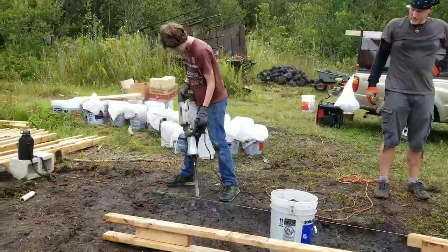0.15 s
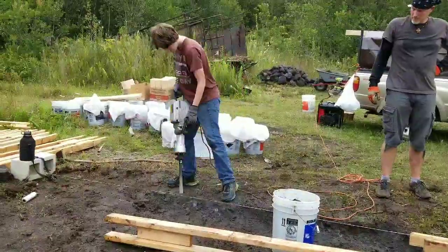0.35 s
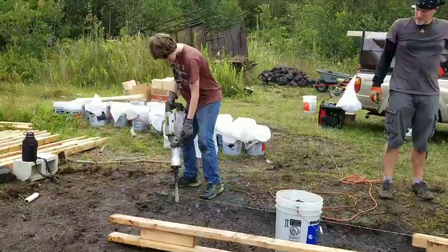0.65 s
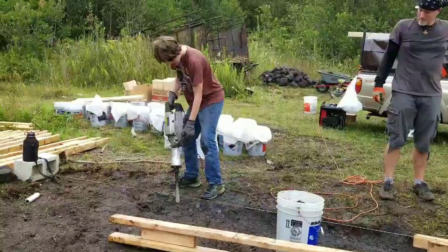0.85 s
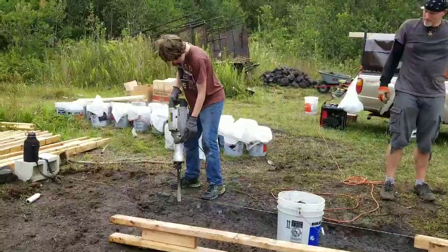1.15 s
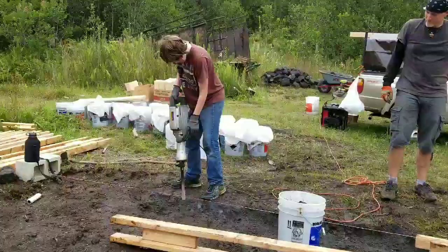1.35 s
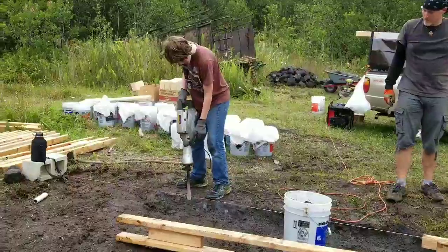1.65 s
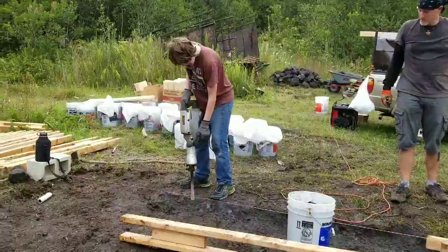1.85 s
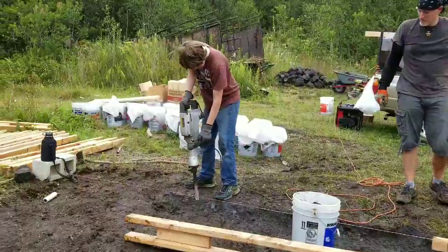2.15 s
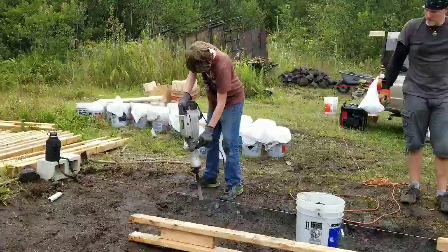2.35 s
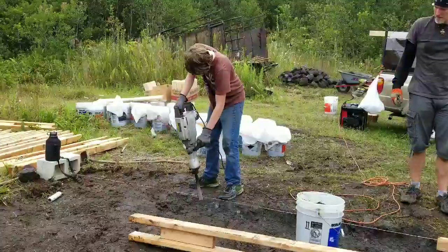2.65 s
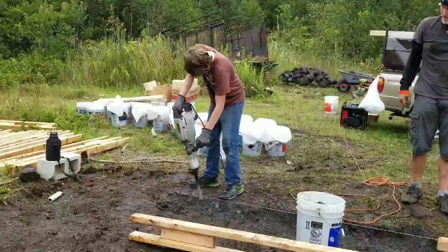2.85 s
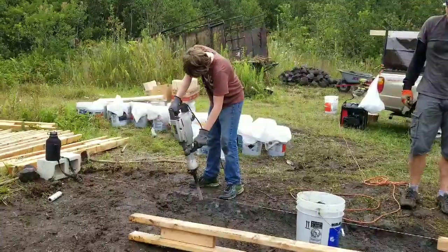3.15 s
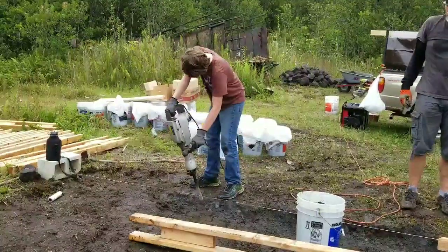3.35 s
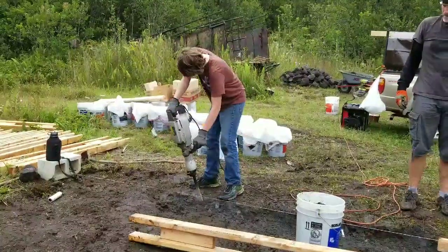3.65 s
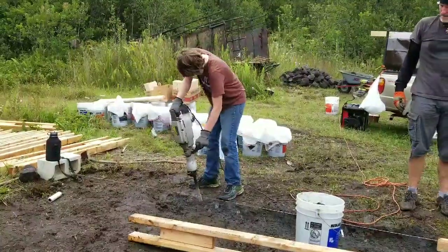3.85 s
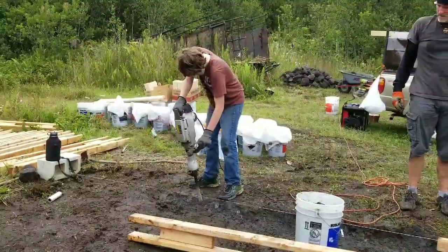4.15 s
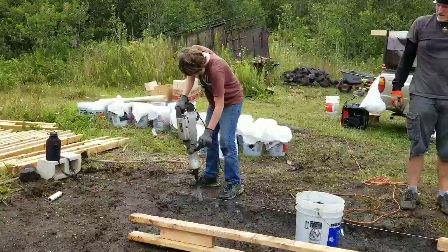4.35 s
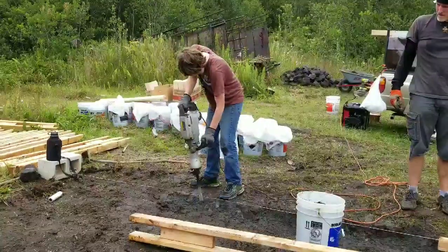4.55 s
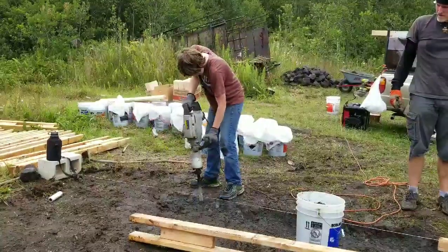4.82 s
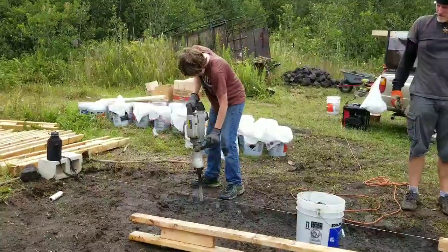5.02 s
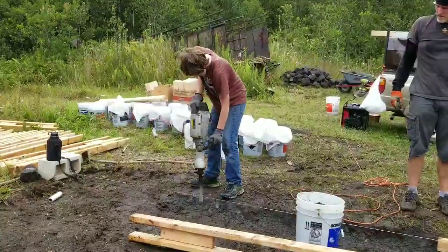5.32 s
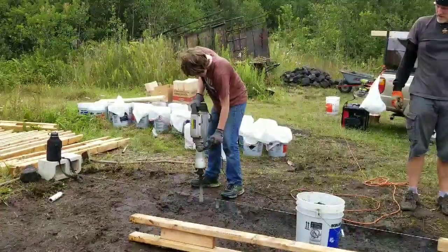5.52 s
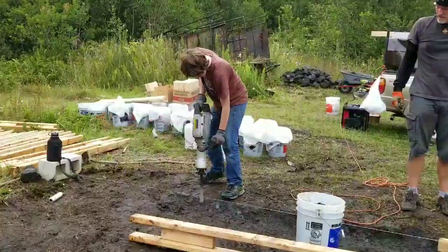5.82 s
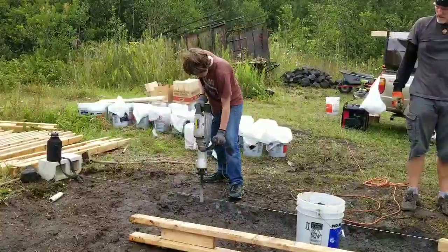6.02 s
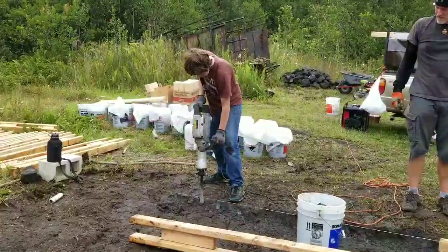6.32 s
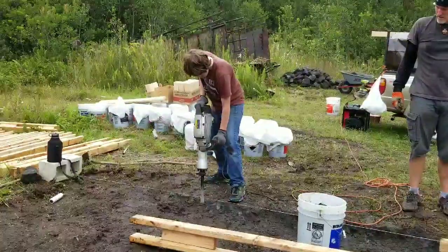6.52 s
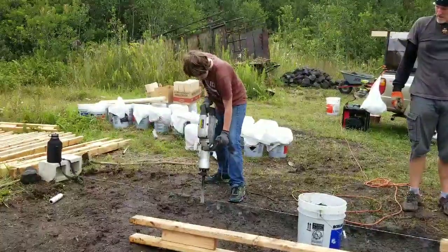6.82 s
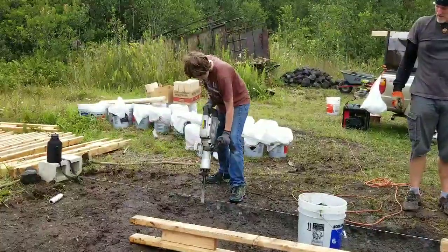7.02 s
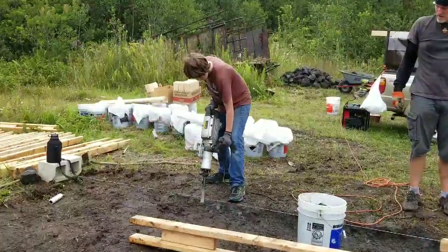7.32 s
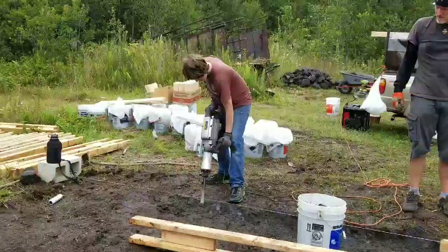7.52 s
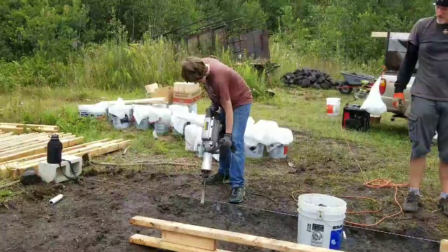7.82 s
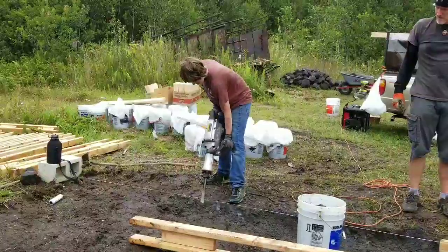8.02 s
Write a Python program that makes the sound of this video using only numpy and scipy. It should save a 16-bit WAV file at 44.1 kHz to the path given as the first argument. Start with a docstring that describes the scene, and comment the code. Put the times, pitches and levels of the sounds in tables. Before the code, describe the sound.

First only a small engine chugging low, slightly to the right, with a mechanical rattle. Two brief metallic clanks follow as a heavy breaker is set on rocky ground. Just before three seconds its motor whirs up, the engine briefly bogs, and hard hammering starts: bright, dry, rapid cracks with ringing steel over knocking soil, continuous and slightly uneven until the cut-off. Close, open yard, little reverberation.

```python
"""Electric jackhammer beside a generator

Outdoors, before a microphone with two ports, an electric jackhammer breaks rocky ground.
The tool is set down twice with a clank, then its motor runs up and the striker hits about 24 times a second.
Each blow is shaped noise for cracking stone and knocking ground, plus decaying modes for the ringing steel.
The chisel rings until it seats again. A generator off to the right thuds with filtered engine pulses.
"""
import sys
import numpy as np
from scipy import signal
from scipy.fft import rfft, irfft, next_fast_len
from scipy.io import wavfile

SR = 44100
rng = np.random.default_rng(int(sys.argv[2]) if len(sys.argv) > 2 else 0)


def put_to_file(sound):
    """Save the sound as 16-bit audio at rate SR, in the file named by the first command-line argument."""
    columns = np.atleast_2d(sound).T  # one column per channel
    safe = np.clip(columns, -1, 1)
    whole_steps = np.round(safe * 32767)
    wavfile.write(sys.argv[1], SR, whole_steps.astype(np.int16))


N = 360297
TIME = np.arange(N) / SR
AGE = np.arange(SR // 5) / SR  # time since a contact, s

# running speed of the striker, wavering with the load: time_s, blows_per_s
STRIKE_RATE = [(3.35, 24.05), (3.6, 23.64), (4.4, 23.55), (4.7, 23.87), (5.7, 23.72), (6.05, 24.02),
               (6.8, 23.5), (7.02, 24.47), (7.2, 23.63), (7.65, 23.61), (7.9, 24.04)]
FIRST_BLOW_S = 2.8245
# extra wait after the first blow while the motor gathers speed; share of it left at each next blow
RUN_UP_WAIT_S, RUN_UP_SHRINK = .0412, .5784


def blow_times(count=125):
    """The gaps between blows shrink as the motor runs up, then follow its speed."""
    times = [FIRST_BLOW_S]
    for k in range(count - 1):
        running_gap = 1 / curve(STRIKE_RATE, times[-1])[0]
        run_up_wait = RUN_UP_WAIT_S * RUN_UP_SHRINK ** k
        times.append(times[-1] + running_gap + run_up_wait)
    return np.array(times)


# how hard the bit bites, before scatter and mixing: time_s, stone_crack_db, ground_knock_db
BITE = [(2.82, -13, -34), (3, -16, -35), (3.15, -13.5, -28), (3.55, -18.5, -36), (3.9, -14.5, -32.5),
        (4.45, -18, -33.5), (4.9, -15, -34.5), (5.45, -16.5, -33.5), (6.42, -14, -27.5), (6.7, -16, -33),
        (7.3, -17, -31), (7.9, -15.5, -28.5), (8.02, -14, -36)]
# the bit's play, loose on rock and tight once buried, before scatter: time_s, ring_db, free_ring_s
PLAY = [(2.82, -17, 0.022), (2.98, -11, 0.02), (3.13, -13.5, 0.0091), (3.28, -12.5, 0.03),
        (3.6, -19.5, 0.028), (4.03, -17.5, 0.025), (4.14, -25, 0.021), (4.42, -15, 0.019),
        (4.95, -20, 0.018), (5.55, -18, 0.021), (5.98, -22, 0.019), (6.05, -43, .008), (6.65, -16.5, 0.02),
        (7, -23, 0.015), (7.4, -38, 0.0059), (7.92, -39, 0.0055), (7.97, -17.5, 0.022),
        (8.13, -11.5, 0.039)]
# chance from blow to blow: force, hardness of the ground, rebound (in ring level)
FORCE_SCATTER_DB, GROUND_SCATTER_DB, REBOUND_SCATTER_DB = 1, 1.45, 4.5
FREE_STRETCH_PER_DB = -0.03  # a livelier rebound is choked sooner


def strikes():
    """Time, crack, knock, ring and free ringing time of each blow: bite and play, varied by chance."""
    s = blow_times()
    crack_db, knock_db = curve(BITE, s)
    ring_db, free_s = curve(PLAY, s)
    force, ground, rebound = rng.standard_normal((len(s), 3)).T
    force_db = FORCE_SCATTER_DB * force
    ground_db = GROUND_SCATTER_DB * ground
    rebound_db = REBOUND_SCATTER_DB * np.minimum(rebound, 1)
    free_s = free_s * np.exp(FREE_STRETCH_PER_DB * rebound_db)
    return s, crack_db + force_db, knock_db + force_db + ground_db, ring_db + rebound_db, free_s


# steel cracking on stone, spectrum: freq_hz, relative_db_per_hz
CRACK_SPECTRUM = [(900, -40), (2000, -58), (2400, -1.5), (2750, -10), (3300, -8), (3600, -9), (4400, 3),
                  (6000, -1.5), (7100, 2.5), (8200, -18), (10000, -18), (12500, -7), (15000, -23),
                  (16500, -5)]
# the knock of the ground, spectrum: freq_hz, relative_db_per_hz
KNOCK_SPECTRUM = [(200, -26.5), (370, -32), (520, -12.5), (700, 2.5), (950, -6), (1350, -5.5), (1900, 4.5),
                  (2200, -10.5), (3500, -16)]
# the thud of packed soil, spectrum: freq_hz, relative_db_per_hz
SOIL_SPECTRUM = [(180, -25.5), (290, -9.5), (380, -3), (450, -8.5), (560, -32), (780, -8.5), (960, 0.5),
                 (1200, -20.5)]
# packed soil thuds more as the bit sinks in: time_s, thud_db (relative to the knock, before mixing)
DEPTH = [(2.8, -9.5), (5.3, -7), (6.1, -4.5), (7.1, 2.5), (7.9, 0), (8.05, -1.5)]
# modes of the tool holder ringing freely: freq_hz, level_db, t60_s
HOLDER_MODES = [(2314, -8.5, 0.048), (3904, -13.5, 0.08), (3988, -2.5, 0.069), (4610, -6, 0.045),
                (5470, -5, 0.042), (5880, -5, 0.09), (6060, -30, 0.61), (6970, -10, .09), (8300, -26, 0.15),
                (11300, -36, 0.052), (14150, -23, .12)]


def blows(s, crack_db, knock_db, ring_db, free_s):
    """Steel cracks on stone, the ground knocks and the holder rings; a soft treble noise burst follows."""
    soil_db = knock_db + curve(DEPTH, s)[0] - 2
    crack = contacts(s, crack_db - 1.12, CRACK_SPECTRUM, burst(t60=0.017, attack=0.000078), repeat=0.44)
    knock = contacts(s, knock_db - .5, KNOCK_SPECTRUM, burst(t60=0.035, attack=0.00044), repeat=0.33)
    thud = contacts(s, soil_db, SOIL_SPECTRUM, burst(t60=0.04, attack=0.00025), repeat=0.54)
    # a soft treble noise burst, starting 6 ms before the chisel's ring is choked
    soft_s = s + free_s - .006
    soft = contacts(soft_s, ring_db - 14, CRACK_SPECTRUM, burst(t60=0.023, attack=0.0034), repeat=.05)
    rings = np.zeros(N)
    pressed = amp(-60 * AGE / 0.15)  # the holder is damped while the tool is leant on
    for when, high_db, low_db in zip(s, crack_db, knock_db):
        add(rings, when, amp(high_db - 10.5) * stone(centre_hz=4776, width=0.204, t60=0.05))
        add(rings, when, amp(low_db - 6) * stone(centre_hz=1860, width=0.16, t60=0.02, count=3))
        holder = ring(HOLDER_MODES, 0, scatter_db=5.0, detune=0.0057, phase_scatter=3.43)
        add(rings, when, amp(high_db - 16.5) * holder * pressed)
    return rings + spread(crack + knock + thud + soft)


def stone(centre_hz, width, t60, count=5):
    """A few brief resonances, new with every bite into the rock."""
    pitch, phase = rng.standard_normal((2, count, 1))
    mode_hz = centre_hz * np.exp(width * pitch)
    modes = np.sin(2 * np.pi * (mode_hz * AGE + phase))
    return np.sqrt(2 / count) * modes.sum(axis=0) * burst(t60, attack=0.00018)


# modes of the chisel ringing freely: freq_hz, level_db, t60_s
CHISEL_MODES = [(3950, -17, .2), (5945, -3, .3), (6794, -3, .26), (6934, -3, .26), (8457, -23, .2),
                (9723, -21, .2), (11375, -22, .12), (13254, -19, .1), (14115, -12.5, .18),
                (14637, -15, .18)]
# how the bit's seating favours its modes:
# time_s, two_lowest_db, lower_of_close_pair_db, upper_of_close_pair_db, all_higher_db
SEATING = [(2.85, -12, 6, -28, -2.5), (3.3, -8.5, -0.5, 0.5, -2.5), (3.6, -8, 7.5, 1, -1),
           (4.15, -22, -4, 7.5, -5), (4.8, -2.5, 0, 0.5, -3.5), (5.3, -7, -4, 0, 0), (5.7, -8, -8, -1, 6),
           (6.7, -13, -10, -2, -0.5), (8.1, -0.5, -9, -5.5, -4)]


def chisel(times, ring_db, free_s):
    """The bit rings after each blow, hardest at first, two close modes beating, and is choked when it seats."""
    track = np.zeros(N)
    strike = (1 + 1.03 * np.exp(-AGE / 0.004)) * (1 - np.exp(-AGE / 0.00057))
    for s, db, free in zip(times, ring_db, free_s):
        # one seating level for each mode
        seating_db = np.pad(curve(SEATING, s), (1, len(CHISEL_MODES) - 5), "edge")[:, None]
        choke = amp(-60 * np.maximum(AGE - free, 0) / 0.001)
        steel = ring(CHISEL_MODES, seating_db, scatter_db=3.5, detune=0.0023, phase_scatter=0.55)
        add(track, s, amp(db - 3.5) * strike * choke * steel)
    return track * amp([[-3], [0.5]])  # left, right


# short treble hiss after each blow, spectrum: freq_hz, relative_db_per_hz
TREBLE_SPECTRUM = [(3000, -26), (6000, -8), (8500, -16), (10500, -8), (12500, 1), (14500, -4), (16000, -20)]
TREBLE_DB, TREBLE_SCATTER_DB = -16.5, 5.5  # relative to the crack; from blow to blow


def treble_hiss(times, crack_db):
    """A short hissing treble noise after each blow, its level varied at random."""
    chance = np.clip(rng.standard_normal(len(times)), -2, 1)
    hiss_db = crack_db + TREBLE_DB + TREBLE_SCATTER_DB * chance
    return spread(contacts(times, hiss_db, TREBLE_SPECTRUM, burst(t60=0.073, attack=.0008), repeat=0))


# the loose chisel clanks as the tool is set down and as the motor starts, levels before mixing:
# start_s, crack_db, ground_knock_db, holder_ring_db
CLANKS = [(0.597, -20.5, -21, -36), (0.6297, -9.5, -22, -18), (0.649, -7.5, -25, -33), (0.66, -9, -16, -27),
          (0.681, -29, -29.5, -31), (.872, -48, -41, -56), (.962, -48, -45, -48), (1.029, -34, -38.5, -44),
          (1.388, -51, -46, -46), (1.545, -19.5, -31.5, -28.5), (1.583, -18, -23, -27.5),
          (1.594, -29, -32, -48), (2.750, -27, -22, -27.5), (2.803, -29, -34, -31)]
# the ground under a clank, spectrum: freq_hz, relative_db_per_hz
CLUNK_SPECTRUM = [(250, -11), (500, -21), (700, 3), (900, -4), (1300, -12.5), (1900, -6), (2400, -7),
                  (3100, -3), (4500, -1.5), (7000, -49)]


def clanks():
    """The chisel meets stone and rattles in its holder: noise bursts over struck modes."""
    s, crack_db, knock_db, ring_db = np.transpose(CLANKS)
    steel = np.zeros(N)
    for when, db in zip(s, ring_db):
        onset = 1 - np.exp(-AGE / 0.00022)
        holder = ring(HOLDER_MODES, 0, scatter_db=1.5, detune=0.00155, phase_scatter=1.4)
        add(steel, when, amp(db + 4) * onset * holder)
    crack = contacts(s, crack_db - 7.5, CRACK_SPECTRUM, burst(t60=0.062, attack=0.00049), repeat=0)
    knock = contacts(s, knock_db, CLUNK_SPECTRUM, burst(t60=0.045, attack=0.0044), repeat=0)
    return steel + spread(crack + knock)


# kicks of the casing in each stroke, before scatter: delay_after_blow_s, level_db
KICKS = [(.0003, -20), (.011, -36.5), (0.019, -39)]
# the thump of the casing, spectrum: freq_hz, relative_db_per_hz
THUMP_SPECTRUM = [(20, -36), (45, -9.5), (75, -3), (110, 0.5), (190, 3.5), (280, 3), (390, -13), (500, -35),
                  (900, -27)]
SHAKE_DB = -43.5  # low rattle of the casing after each blow


def piston(times):
    """The casing kicks with each blow and again, more softly, as the piston turns back; it shakes in between."""
    kicks = np.zeros((1, N + SR))
    for delay, db in KICKS:
        delay_chance, level_chance = rng.standard_normal((len(times), 2)).T
        when = times + delay * (1 + 0.073 * delay_chance)
        kicks[0, (when * SR).astype(int)] += amp(db + 2.0 * level_chance)
    shake_db = np.full(len(times), SHAKE_DB)
    shake = contacts(times, shake_db, THUMP_SPECTRUM, burst(t60=.15, attack=0.0016), repeat=.3)
    return coloured(kicks, THUMP_SPECTRUM) + spread(shake)


# gears, brushes and fan, spectrum: freq_hz, relative_db_per_hz
MOTOR_SPECTRUM = [(40, -26), (150, -0.5), (350, -20.5), (500, -17), (720, -6.5), (950, -10.5), (1300, -11),
                  (2400, -2), (3000, -1), (4600, 1), (6800, 1), (8500, -21), (12500, -15), (16000, -10)]
SWITCH_ON_S, RISE_S = 2.72, 0.1
MOTOR_DB, SURGE_DB, SETTLE_S = -34, 13.5, 0.49  # base level, starting surge and its time constant
LABOUR = 0.28  # dB more motor noise for each dB of soil thud


def motor(times):
    """Gears, brushes and fan surge at switch-on, labour in deep soil and swell as air is compressed before a blow."""
    running = np.maximum(TIME - SWITCH_ON_S, 0)
    effort_db = MOTOR_DB + SURGE_DB * np.exp(-running / SETTLE_S) + LABOUR * curve(DEPTH)[0]
    stroke = np.interp(TIME, times, np.arange(len(times)))  # counts blows, with fractions in between
    load_db = 2.2 * np.cos(2 * np.pi * (stroke - .93))
    # a fast random flicker of the level
    chatter_db = 4.2 * np.interp(TIME, np.linspace(0, TIME[-1], 3000), rng.standard_normal(3000))
    rush = spread(coloured(rng.standard_normal((2, N)), MOTOR_SPECTRUM))
    rise = np.minimum(running / RISE_S, 1) ** 1.03
    return rush * rise * amp(effort_db + load_db + chatter_db)


def bump():
    """One dull low bump amid the hammering: a decaying 56 Hz sine."""
    track = np.zeros(N)
    add(track, 5.355, amp(-33) * np.sin(2 * np.pi * 56 * AGE) * amp(-60 * AGE / .07))
    return track


# level at which the generator is heard, turned down while the hammer is loud: time_s, level_db (relative)
HEARD_LEVEL = [(0, 2), (1.2, -1), (1.65, -0.8), (2.1, 2), (2.72, 2.8), (2.83, 6), (3, -2.5), (3.4, -15),
               (8.17, -12)]
# the engine bogs as the hammer starts, then its governor speeds it up: time_s, cycles_per_s
ENGINE_SPEED = [(0, 20.757), (2.74, 20.757), (2.8, 18.7), (2.9, 20.3), (3.1, 22.6), (3.3, 23.3),
                (3.7, 22.65), (5, 22.75), (8.17, 22.95)]
# one engine cycle, a gulp of air and an exhaust puff: place_in_cycle (0-1), flow_direction (sign)
STROKES = [(.815, -1), (.124, 1)]
# the thud of gulp and puff, spectrum: freq_hz, relative_db_per_hz
PUFF_SPECTRUM = [(20, -37), (45, -16.5), (65, -14), (105, -3.5), (140, -6), (175, 0), (240, -6),
                 (300, -6.5), (400, -25), (520, -30.5), (1000, -49.5)]
# the exhaust under load, spectrum: freq_hz, relative_db_per_hz
BOOM_SPECTRUM = [(50, -27), (90, -8), (113, 4.5), (138, -4.5), (300, -49)]
# the engine's mechanical din, spectrum: freq_hz, relative_db_per_hz
DIN_SPECTRUM = [(20, -13), (60, -1), (200, 0), (400, -3.5), (520, -17), (670, 2), (1100, -7), (1400, -16),
                (2400, -10.5), (3200, -15), (6900, -15.5), (8800, -30), (13000, -16.5), (16000, -26)]
# likeness of the generator's noise at the two ports: freq_hz, likeness (0-1)
GENERATOR_ALIKE = [(30, 0.96), (300, 1), (800, 1), (1400, 0.36), (6000, 0.37), (14000, 0.34)]


def generator():
    """A slow four-stroke engine: two thuds a cycle over its mechanical din, with a hiss at each puff."""
    speed, idle_speed = curve(ENGINE_SPEED)[0], ENGINE_SPEED[0][1]
    turns = np.cumsum(speed) / SR
    pulses = np.zeros((1, N))
    for place, direction in STROKES:
        when = np.searchsorted(turns, np.arange(place, turns[-1], 1))
        pulses[0, when] = direction * amp(-6.0 + .5 * rng.standard_normal(len(when)))
    # under load, read from the speed above idle, the exhaust grows fuller in its lowest resonance
    load = np.clip((speed - idle_speed) / 2, 0, 1)
    thuds = coloured(pulses, PUFF_SPECTRUM) + amp(-6.5) * load * coloured(pulses, BOOM_SPECTRUM)
    since_puff = (turns - STROKES[1][0]) % 1  # in cycles
    # valves and gears repeat part of their clatter on every cycle
    clatter = rng.standard_normal((2, SR))[:, (since_puff * SR / idle_speed).astype(int)]
    rattle = 0.67 * rng.standard_normal((2, N)) + 0.67 * clatter
    din = spread(coloured(rattle, DIN_SPECTRUM), GENERATOR_ALIKE)
    hiss = spread(coloured(rng.standard_normal((2, N)), CRACK_SPECTRUM), GENERATOR_ALIKE)
    hiss = hiss * np.exp(-since_puff / 0.16)
    sound = amp(curve(HEARD_LEVEL)) * (thuds + amp(-39.5) * din + amp(-39.0) * hiss)
    # it stands off to the right, so the left port hears it 8 samples later
    return np.array([np.roll(sound[0], 8), sound[1]])


# decay of the yard's echo: freq_hz, t60_s
YARD_DECAY = [(200, 0.09), (2000, 0.46), (12000, 0.21)]


def yard(x):
    """A faint answer from ground, timber and trees: a decaying noise tail that starts 5 ms late."""
    hz, t, z = signal.stft(rng.standard_normal((2, SR // 2)), SR, nperseg=256)
    decay = amp(-60 * t / along(YARD_DECAY, hz)[:, None])
    tail = signal.istft(z * decay, SR, nperseg=256)[1]
    late_tail = np.pad(tail, ((0, 0), (SR // 200, 0)))
    return signal.fftconvolve(x, late_tail / np.linalg.norm(tail[0]), axes=1)[:, :N]


def contacts(times, levels_db, spectrum, shape, repeat):
    """Short dense vibrations, direct and scattered; a share of each repeats from blow to blow."""
    track, same = np.zeros((2, N)), rng.standard_normal((2, len(AGE)))
    share = np.clip(repeat, 0, 1)
    for s, db in zip(times, levels_db):
        fresh = rng.standard_normal(same.shape)
        add(track, s, amp(db) * shape * (np.sqrt(share) * same + np.sqrt(1 - share) * fresh))
    return coloured(track, spectrum)


def burst(t60, attack):
    """A fast rise and a steady decay, with the energy of 7 ms at rms 1."""
    shape = amp(-60 * AGE / t60) * (1 - np.exp(-AGE / attack))
    return shape / np.sqrt(np.sum(shape ** 2) / (.007 * SR))


def ring(modes, extra_db, scatter_db, detune, phase_scatter):
    """Modes struck once, each at a slightly new strength and pitch."""
    hz, db, t60 = np.transpose(modes)[:, :, None]
    size, pitch, phase = rng.standard_normal((3, len(modes), 1))
    mode_hz = hz * (1 + detune * pitch)
    # but for the phase scatter, all modes line up 2 ms after the blow
    swing = np.sin(2 * np.pi * mode_hz * (AGE - .002) + phase_scatter * phase)
    level_db = db + extra_db + scatter_db * size - 60 * AGE / t60
    return np.sqrt(2) * np.sum(amp(level_db) * swing, axis=0)


# likeness of the hammer's noise at the two ports: freq_hz, likeness (0-1)
HAMMER_ALIKE = [(40, .3), (130, 0.78), (350, 0.84), (900, 0.97), (1400, 0.41), (2400, 0.41), (4000, 0.81),
                (8000, 0.31), (14000, 0.77)]


def spread(pair, alike=HAMMER_ALIKE):
    """Direct and scattered sound to left and right."""
    def shares(hz):
        turn = np.arccos(np.clip(along(alike, hz), 0, 1)) / 2
        return np.array([np.cos(turn), np.sin(turn)])

    mid, side = filtered(pair, shares)
    return np.array([mid + side, mid - side])


def coloured(x, spectrum, size=4096):
    """Rows of x through a causal filter of energy 1 with this spectrum."""
    # folding the cepstrum makes the filter minimum phase
    cepstrum = irfft(np.log(amp(along(spectrum, np.fft.rfftfreq(size, 1 / SR)))))
    cepstrum[1:size // 2] *= 2
    cepstrum[size // 2 + 1:] = 0
    answer = irfft(np.exp(rfft(cepstrum)))
    return signal.fftconvolve(x, answer[None] / np.linalg.norm(answer), axes=1)[:, :N]


def filtered(x, response):
    """x times a complex response of frequency."""
    m = next_fast_len(N + SR // 2)
    return irfft(rfft(x, m) * response(np.fft.rfftfreq(m, 1 / SR)), m)[..., :N]


def add(track, s, sound):
    """Mix a sound into a track at time s."""
    part = track[..., max(round(s * SR), 0):][..., :len(AGE)]
    part += sound[..., :part.shape[-1]]


def curve(rows, at=TIME):
    """Each column after the time, read at the given times."""
    s, *cols = np.transpose(rows)
    return np.array([np.interp(at, s, c) for c in cols])


def along(points, hz):
    """Values of (Hz, value) points, read on a log frequency axis."""
    f, v = np.transpose(points)
    return np.interp(np.log(hz + 1), np.log(f), v)


def amp(db):
    """Decibels to gain."""
    return 10 ** (np.asarray(db) / 20)


def scene():
    """The hammer with its motor, the yard's echo of its blows, and the generator."""
    s, crack_db, knock_db, ring_db, free_s = strikes()
    hammer = blows(s, crack_db, knock_db, ring_db, free_s) + chisel(s, ring_db, free_s)
    hammer = hammer + treble_hiss(s, crack_db) + clanks()
    return hammer + amp(-15.5) * yard(hammer) + piston(s) + motor(s) + bump() + generator()


# level between the two microphone ports: freq_hz, left_minus_right_db
PORT_BALANCE = [(100, .5), (380, .8), (700, 2.5), (1300, 2.2), (2400, .7), (4400, -3.5), (6000, -4.5),
                (6900, -9), (8200, -7), (11000, -2), (15000, -2)]
# phase between the two microphone ports: freq_hz, left_lead_rad
PORT_LEAD = [(1900, 0), (2700, -1), (3200, -.6), (4300, -.4), (5400, .2), (6200, .2), (7000, 1.3),
             (8400, 1), (10000, 2.1), (12500, 3), (16000, 3.2)]
TOP_HZ = 16000


def record(dry):
    """The two ports hear the treble differently; peaks are rounded off and the band is limited."""
    def ports(hz):
        left = amp(along(PORT_BALANCE, hz) / 2) * np.exp(.5j * along(PORT_LEAD, hz))
        # the ports differ, but their mean power gain stays 1
        return np.array([left, 1 / left]) / np.sqrt((abs(left) ** 2 + abs(left) ** -2) / 2)

    x = filtered(dry, ports)
    x = x / (1 + np.abs(x) ** 6) ** (1 / 6)
    return filtered(x, lambda hz: hz < TOP_HZ)


dry = scene()
out = record(dry)
put_to_file(out)
```